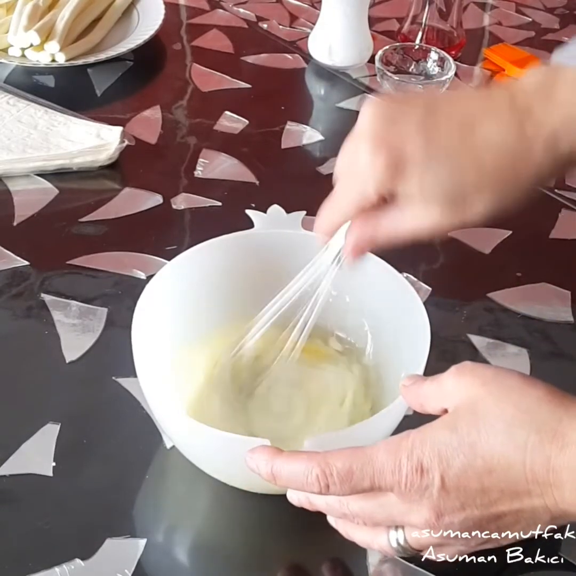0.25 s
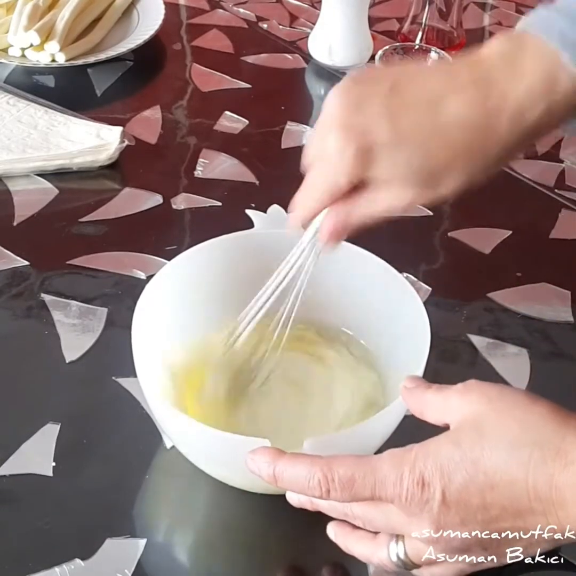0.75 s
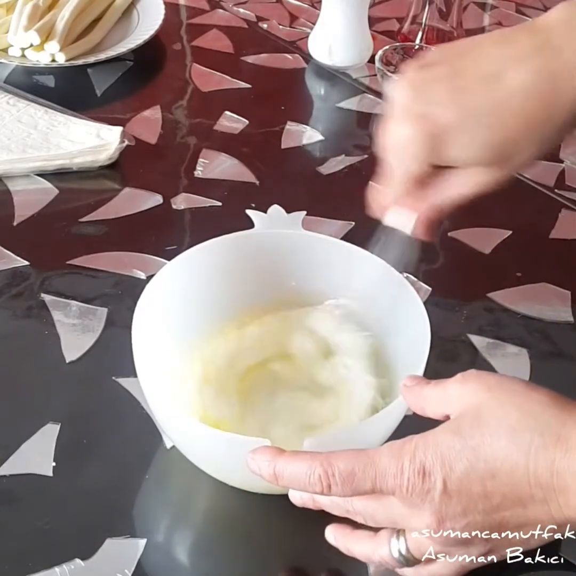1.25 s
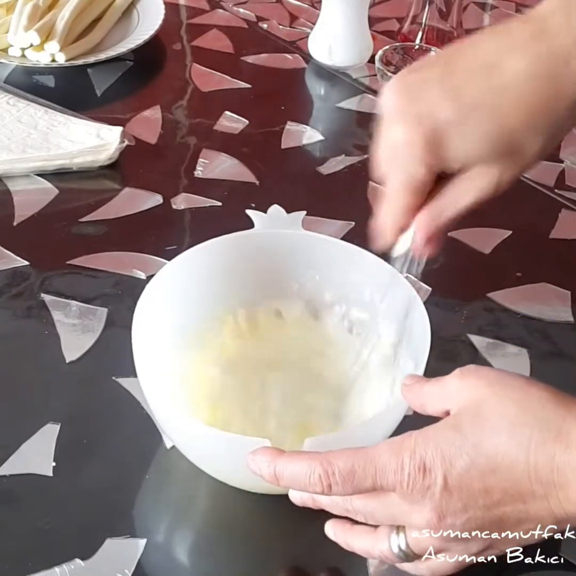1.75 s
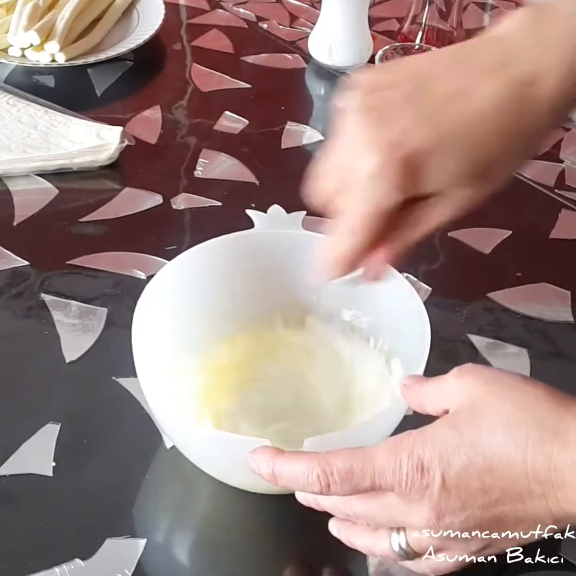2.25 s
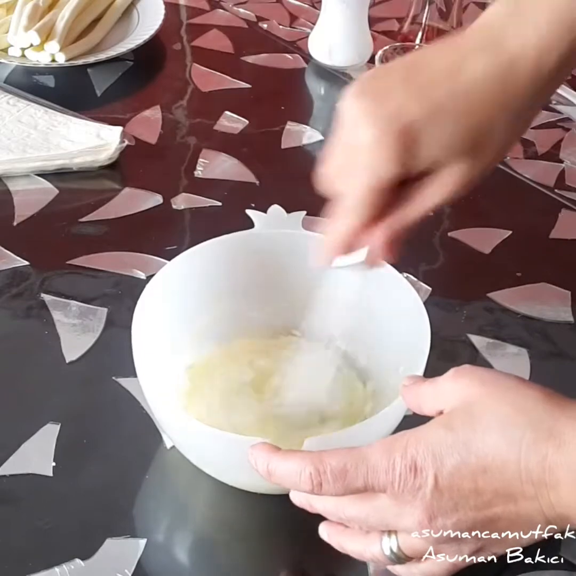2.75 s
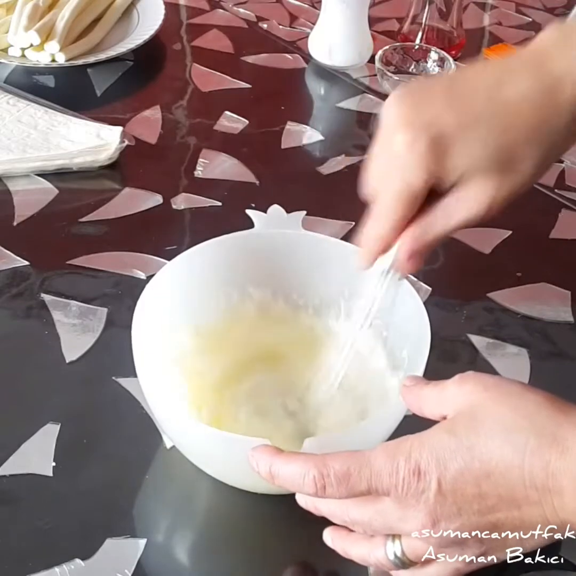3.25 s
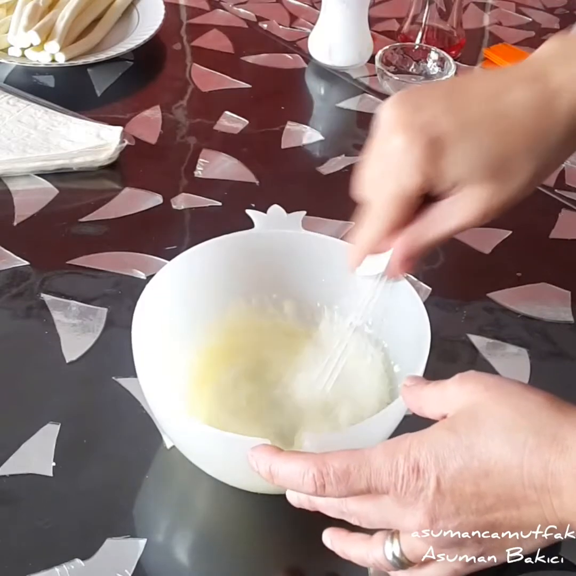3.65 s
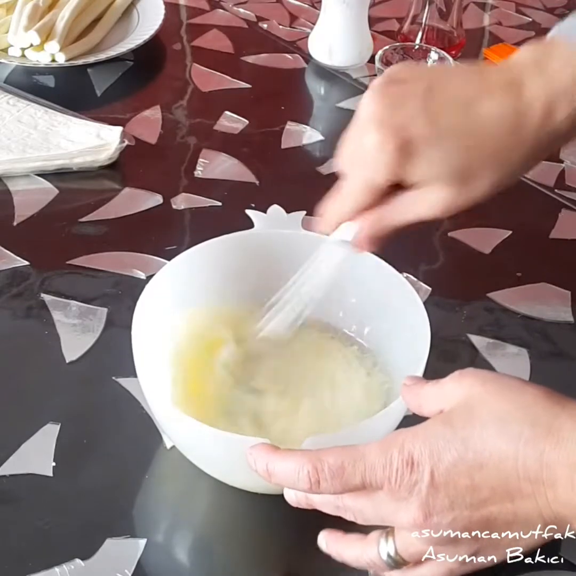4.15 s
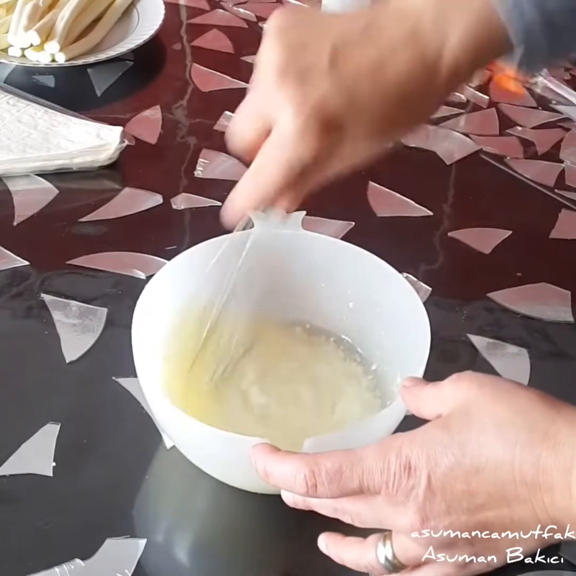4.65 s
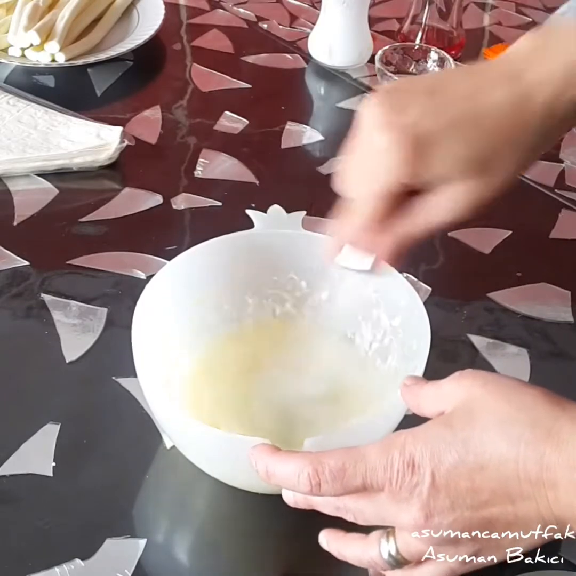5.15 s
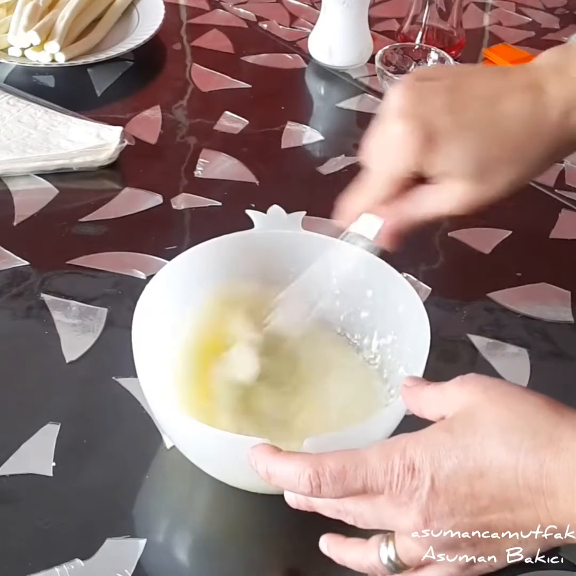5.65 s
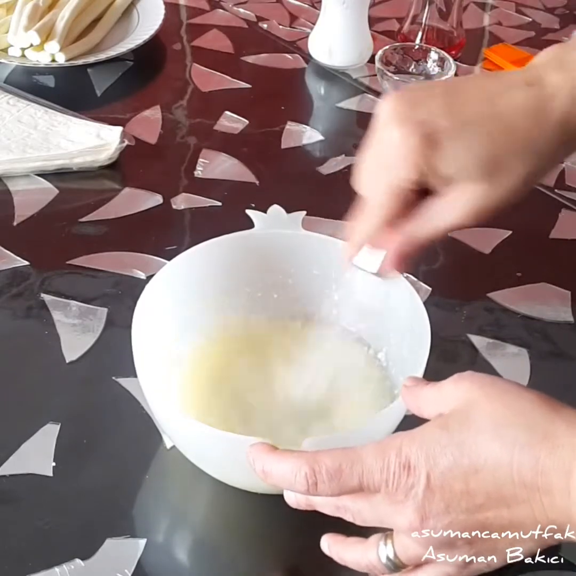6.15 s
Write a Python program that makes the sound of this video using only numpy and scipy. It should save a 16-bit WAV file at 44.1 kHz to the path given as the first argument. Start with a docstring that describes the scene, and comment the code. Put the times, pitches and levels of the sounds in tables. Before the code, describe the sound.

Close up, a wire whisk rapidly beats runny batter in a plastic bowl. Clusters of light hollow knocks and bright ticks mix with short wet scraping swishes and tiny bubbling blips. It starts busy, grows gentler around the middle, then turns loud and clattery with soft low bowl thumps. A hard kitchen adds a short, light echo over faint room hiss.

```python
"""On a kitchen table, close to a two-port microphone, a wire whisk beats thin batter in a plastic bowl.
The wires knock on the wall in small clusters and drag along it through the batter; both drive the modes
of body and wall, while noise cracks and clicks give the bright ticks of wire on plastic.
Bubbles burst as rising blips, the table booms as the bowl rocks, and sparse decaying echoes are the hard
kitchen; faint steady noise lies below."""
import sys
import numpy as np
from scipy import signal
from scipy.io import wavfile
from scipy.ndimage import uniform_filter1d

SR = 44100
rng = np.random.default_rng(int(sys.argv[2]) if len(sys.argv) > 2 else 0)


def inscribe(sig):
    """Save sig as 16-bit PCM at rate SR to the path in sys.argv[1].

    A 1-D sig is mono; a 2-D sig holds one channel per row.
    Samples are clipped to [-1, 1] before scaling.
    """
    pcm = np.round(np.clip(np.atleast_2d(sig).T, -1, 1) * 32767)
    wavfile.write(sys.argv[1], SR, pcm.astype(np.int16))


N = 281532  # length in samples

# All levels are relative: each layer is balanced again where it is made or mixed.
# Wires striking the wall:
# (time [s], knock level [dB], tick level over the knock [dB], pitch round which the struck spot rings best [Hz])
BLOWS = [(0.053, -18, -11, 2580), (0.103, -18.5, -1, 2720), (0.136, -15, 4, 1440), (0.26, -10.5, -9, 1490),
         (0.285, -12, -7, 1730), (0.312, -37, 17, 3540), (0.348, -17.5, 0, 2730), (0.448, -28, -12, 1900),
         (0.484, -23, -22, 2760), (0.501, -20.5, -24, 2560), (0.523, -14.5, -7, 1750),
         (0.568, -24.5, 11, 3580), (0.619, -14.5, -23, 3120), (0.709, -14.5, -25, 910),
         (0.762, -25, 6, 2740), (0.792, -18, 1, 970), (0.84, -24, 1, 3640), (0.928, -13.5, -10, 1710),
         (0.954, -16.5, -23, 1470), (1.018, -19, 3.5, 2930), (1.074, -30.5, 6.5, 4000),
         (1.091, -16.5, -4.5, 1770), (1.179, -27, -27, 1860), (1.195, -14.5, -13.5, 1630),
         (1.257, -23.5, 3, 3170), (1.326, -24, -13, 1000), (1.381, -43, 10, 3600), (1.387, -28, -18, 1000),
         (1.44, -30.5, 12, 4000), (1.445, -18.5, -27, 2430), (1.586, -21, -11, 1820),
         (1.668, -17.5, -23, 2580), (1.713, -31.5, 16, 3630), (1.805, -21, -4.5, 3050),
         (1.843, -16, -24, 2640), (1.91, -29, 0, 1800), (2.015, -18.5, -8, 955), (2.058, -12.5, -18, 2630),
         (2.103, -25.5, 2.5, 1710), (2.248, -11.5, -11, 1680), (2.266, -11, -7.5, 3200),
         (2.278, -11.5, -13, 2970), (2.476, -20.5, -4, 1500), (2.511, -21.5, -12, 2700),
         (2.549, -23.5, -23, 1700), (2.616, -27.5, -6, 1400), (2.703, -24, -15, 1980),
         (2.766, -33, 7, 2860), (2.781, -22.5, -22, 2620), (2.797, -24, -22, 2480),
         (2.865, -35.5, -3.5, 2680), (2.926, -26.5, -4, 1910), (2.993, -23.5, -23, 1620),
         (3.02, -25, -7, 2520), (3.176, -41, 3, 2750), (3.227, -38, -8, 2700), (3.278, -29.5, -3.5, 2920),
         (3.397, -30.5, -3, 1790), (3.432, -27, -6, 1910), (3.485, -24, -13, 2700), (3.592, -37, 2.5, 1850),
         (3.692, -27, -19, 1000), (3.714, -29.5, -8, 2750), (3.812, -37, 11.5, 3600),
         (3.87, -29.5, 9, 2800), (3.97, -23, -15, 2390), (4.049, -14.5, -13, 1160), (4.083, -29, 4, 2800),
         (4.096, -8, -11.5, 1740), (4.099, -8, -10, 1800), (4.202, -8, -7.5, 1520),
         (4.409, -19.5, -11, 1640), (4.46, -22.5, -7, 3360), (4.5, -16, -16.5, 961),
         (4.531, -14.5, -6, 1710), (4.563, -12.5, -3.5, 800), (4.631, -12.5, -5, 1020),
         (4.725, -17, -9, 1700), (4.739, -9.5, -5, 2600), (4.743, -7.5, -4.5, 1780), (4.845, -11, -4, 1050),
         (4.867, -14.5, -24, 1070), (4.907, -16.5, -19, 1800), (4.943, -10.5, -3, 3250),
         (4.955, -21.5, 1, 2700), (5.056, -17.5, -1.5, 3030), (5.141, -15, -15, 1000), (5.16, -23, -4, 960),
         (5.203, -18, 0, 2630), (5.246, -23.5, -1, 1830), (5.263, -18.5, -3, 1840), (5.3, -23, -4, 2580),
         (5.328, -13, -7.5, 2720), (5.614, -28, -4, 1780), (5.667, -19, -3, 2260), (5.752, -26.5, 6.5, 910),
         (5.89, -25.5, -15, 1010), (5.91, -25, -12, 2780), (5.98, -19, -11, 1720), (6.005, -13.5, -16, 940),
         (6.037, -30, 9, 2640), (6.136, -7.5, -1, 1110), (6.231, -11.5, -6.5, 1310), (6.251, -14, -3, 1790),
         (6.332, -26, 2, 1810)]
# Sweeps of the wires round the wall:
# (start [s], length [s], pressure [dB], thud over the pressure [dB], edge, the bright part [dB],
#  pitch round which the rubbed spot rings best [Hz])
SWEEPS = [(0.0, 0.0075, -48.5, -5, -40, 2150), (0.071, 0.076, -41.5, -7.5, -41, 2430),
          (0.11, 0.084, -46.5, -16, -38, 2540), (0.29, 0.065, -40, -8, -36.5, 1450),
          (0.394, 0.061, -46.5, -8, -42.5, 1730), (0.512, 0.14, -46.5, -6, -42, 1950),
          (0.702, 0.099, -42.5, -13, -39.5, 1880), (0.78, 0.079, -47.5, -8, -46.5, 1620),
          (0.887, 0.11, -46.5, -7.5, -42, 1650), (1.015, 0.14, -50.5, -26, -48, 2760),
          (1.182, 0.026, -46.5, -8, -47, 1330), (1.33, 0.093, -50.5, -12, -46.5, 2550),
          (1.489, 0.018, -48, -6.5, -39, 1980), (1.591, 0.03, -46.5, -19, -43.5, 2750),
          (1.666, 0.047, -44.5, -9.5, -42, 2840), (1.821, 0.049, -43, -7, -49.5, 1830),
          (1.909, 0.02, -54, -25, -39.5, 2220), (2.024, 0.079, -46, -8, -45.5, 1130),
          (2.274, 0.067, -44.5, -11, -46, 1250), (2.505, 0.022, -48.5, -2, -45, 2780),
          (2.568, 0.05, -50.5, -6, -46, 2460), (2.707, 0.068, -53, -8.5, -50, 2540),
          (2.943, 0.089, -58.5, -1.5, -53.5, 2080), (3.09, 0.13, -67, -24, -64, 2840),
          (3.292, 0.01, -63, -8, -52, 2540), (3.42, 0.084, -60.5, -0.5, -54, 2260),
          (3.564, 0.095, -62.5, -9, -58, 2540), (3.707, 0.074, -54.5, -5.5, -51, 2700),
          (3.821, 0.073, -48, -16, -44.5, 1850), (3.979, 0.041, -47.5, -12, -42.5, 2460),
          (4.076, 0.045, -37.5, -8, -37.5, 1610), (4.21, 0.023, -42, -21, -43, 930),
          (4.308, 0.023, -41, -8.5, -35.5, 2440), (4.41, 0.095, -46.5, -24, -42.5, 1730),
          (4.517, 0.074, -43.5, -6.5, -39.5, 1740), (4.66, 0.055, -47.5, -18, -49.5, 1370),
          (4.74, 0.011, -35.5, -32, -36.5, 1040), (4.85, 0.022, -42, -30, -41, 900),
          (4.949, 0.023, -34, -13.5, -31, 1760), (5.06, 0.061, -48, -5, -49, 1460),
          (5.147, 0.064, -44, -7.5, -38.5, 2090), (5.342, 0.032, -48, -15, -42.5, 1970),
          (5.419, 0.1, -59, -9, -49.5, 2670), (5.678, 0.057, -48, -7.5, -44.5, 1550),
          (5.804, 0.015, -47.5, -18, -42, 2100), (5.913, 0.071, -49, -26, -45.5, 3050),
          (6.011, 0.046, -42, -7, -35, 1520), (6.15, 0.05, -43.5, -11, -52, 1060),
          (6.248, 0.012, -36.5, -5, -34.5, 1480), (6.335, 0.036, -45, -3.5, -38.5, 2850)]
# Low thumps of the bowl body, some faint, some heavy, in time order: (time [s], level [dB], pitch round which
# the body rings best [Hz])
THUMPS = [(0.71, -37.5, 426), (1.197, -40, 446), (1.808, -40, 326), (2.271, -32, 348), (2.993, -48, 414),
          (4.106, -36, 330), (4.203, -43.5, 436), (4.478, -40, 395), (4.627, -42, 447), (4.741, -31, 412),
          (4.848, -36.5, 495), (4.945, -27.5, 320), (5.328, -37, 420), (6.138, -35, 500)]
# Modes of the bowl body, pushed by the weight of a blow: (middle pitch [Hz], level [dB], t60 [s])
BODY_MODES = [(255, -7, 0.07), (335, -4, 0.065), (425, -2, 0.04), (495, -3, 0.035)]
# Modes of the bowl wall: (middle pitch [Hz], level [dB], t60 [s])
WALL_MODES = [(705, -21, 0.05), (815, -11, 0.04), (960, -7, 0.035), (1081, -8, 0.03), (1340, -9, 0.02),
              (1690, -8, 0.018), (1810, -5.5, 0.02), (2330, -12, 0.025), (2600, -6, 0.018),
              (2760, -5, 0.02), (3050, -11, 0.02), (3238, -8.5, 0.03), (3600, -6, 0.022),
              (4420, -15, 0.035)]
# One wire loop that rings thinly: (pitch [Hz], level [dB], t60 [s])
WIRE_LOOP = (7375, -54, .2)
# Colour of wire on plastic: (pitch [Hz], spectrum level [dB])
TICK_COLOUR = [(500, -30.5), (2060, -12), (3500, -5.5), (4220, -3.5), (5180, -0.5), (6120, -3), (7200, 4),
               (7610, 5), (11500, -14), (14400, -17.5), (15200, -42)]
# Jolts of the table top as the bowl rocks on it: (time [s], level [dB])
ROCKING = [(0.599, -58), (1.099, -59.5), (2.272, -55), (4.206, -57.5), (4.474, -56.5), (4.637, -60),
           (4.755, -55), (4.949, -56), (5.327, -60)]
# Reverberation of the kitchen: (pitch [Hz], t60 [s])
KITCHEN_T60 = [(150, 0.53), (500, 0.44), (2000, 0.18), (6000, 0.3), (12000, 0.23)]
# Likeness of the two ports: (pitch [Hz], likeness from 0 to 1)
PORT_LIKENESS = [(60, 0.15), (150, 0.26), (400, 1), (650, 0.018), (2000, 0.056), (7000, 0.17), (15000, 1)]
# Colour of the quiet kitchen: (pitch [Hz], spectrum level [dB])
HUSH_COLOUR = [(12, -33), (20, 14), (59, 4), (415, -3.5), (613, -10), (1010, -10), (5520, -6), (7490, 0),
               (14400, -5.5), (15200, -38)]
# How fast a volley of wires thins out: (thud [dB/s], knock [dB/s], tick [dB/s])
THIN_DB_PER_S = (1800, 2600, 5000)

# Slopes of a sweep as (pressure, edge); a negative sag rises
BITE_DB_PER_S, SAG_DB_PER_S, LET_GO_DB_PER_S = (455, 420), (0.5, -2), (251, 274)
WEIGHT_DB = -20  # thud of a blow over its knock, before the mix
TABLE_HZ, TABLE_T60 = 119, 0.3  # middle pitch [Hz] and decay [s] of the table top
DIP_HZ, DIP_SHARE = 650, 0.61  # the bounce off the table cancels this share round this pitch
HUSH_DB = -61
EDGE_HZ = 15600  # upper band limit of the recorder


def blows(count=8):
    """Every blow is a volley of wires that thins out within a few ms, the ticks soonest."""
    s, db, edge_db, spot_hz = np.transpose(BLOWS)
    place, chance, sign = rng.random((len(s), 3, count)).transpose(1, 0, 2)
    wire = np.arange(count)
    late_s = 0.0008 * (wire + place * (wire > 0))  # the first wire lands on time
    at = np.minimum(((s[:, None] + late_s) * SR).astype(int), N - 1)
    signs = np.where(late_s > 0, np.sign(sign - 0.5), 1)
    share = gain_of(-5 * chance) * signs
    swell = 1 - np.exp(-(late_s + 0.0004) / 0.0006)  # the wall yields before it rings
    sizes = []
    # thud, knock and tick; ticks start at once
    for extra_db, thin, rise in zip((WEIGHT_DB, 0, edge_db), THIN_DB_PER_S, (swell, swell, 1)):
        fading = gain_of((db + extra_db)[:, None] - thin * late_s)
        sizes.append(fading * share * rise)
    return at, spot_hz, sizes


def sweeps(t):
    """Each sweep bites, holds and lets go: summed thud, pressure and edge [dB], and the strongest one's spot."""
    start, length, db, weight_db, edge_db, spot_hz = np.transpose(SWEEPS)[:, :, None]
    since = t - start
    early = np.maximum(-since, 0)
    held = np.clip(since, 0, length)
    late = np.maximum(since - length, 0)
    press, edge = (-bite * early - sag * held - go * late
                   for bite, sag, go in zip(BITE_DB_PER_S, SAG_DB_PER_S, LET_GO_DB_PER_S))
    levels = []
    for each in (db + weight_db + press, db + press, edge_db + edge):
        power = np.sum(gain_of(2 * each), axis=0)
        levels.append(10 * np.log10(power + 1e-12))
    strongest = np.argmax(db + press, axis=0)
    return levels, spot_hz[strongest, 0]


def drag(per_s=1800):
    """Tiny slips of wire on the wet wall, some larger than the rest, coming in small clumps."""
    at = np.flatnonzero(rng.random(N) < per_s / SR)
    levels, spot_hz = sweeps(at / SR)
    uneven_db = 2.4 * np.minimum(rng.exponential(1, N), 4)
    clumps_db = 3 * drift(0.006)
    uneven = evened(gain_of(uneven_db + clumps_db)[at])
    size = gain_of(-3.5) * uneven * np.sqrt(SR / per_s)
    return at, spot_hz, [size * gain_of(level) for level in levels]


def thumps(hit_at, thud, level_db=4.0, middle_hz=400):
    """The thuds of all blows and the low thumps, each thump a single push on the body, as one list."""
    s, db, spot_hz = np.transpose(THUMPS)
    push = np.zeros((len(s), hit_at.shape[1]))
    push[:, 0] = gain_of(db + level_db)
    at = np.repeat((s[:, None] * SR).astype(int), hit_at.shape[1], axis=1)
    all_hz = np.r_[np.full(len(hit_at), middle_hz), spot_hz]
    return np.r_[hit_at, at], np.r_[thud, push], all_hz


def bowl(hit_at, hit_size, slip_at, slip_size, modes, spot_hz, rub_hz, place_db=2.0, wander_db=4.5,
         focus_db=7.0, rub_focus_db=3.5, ping_db=3.0):
    """Each blow rings another mix of modes; the drag wanders over the wall, now and then pinging one mode."""
    out = np.zeros((2, N))
    energy = sum(gain_of(2 * db) * t60 * SR / (4 * np.log(1000)) for hz, db, t60 in modes)
    for hz, db, t60 in modes:
        # both focuses fall off per octave from the spot's own pitch
        spot_db = place_db * rng.standard_normal(len(hit_at))
        spot_db -= focus_db * abs(np.log2(hz / spot_hz))
        rub_db = wander_db * drift(0.033)[slip_at]
        rub_db -= rub_focus_db * abs(np.log2(hz / rub_hz))
        pings = evened(gain_of(ping_db * np.minimum(rng.exponential(1, len(slip_at)), 5)))
        hits = hit_size * gain_of(spot_db)[:, None] / np.sqrt(len(modes))
        slips = slip_size * pings * gain_of(rub_db) * rng.choice([-1, 1], len(slip_at))
        drive = two_ports(hit_at.ravel(), hits.ravel(), hz)
        drive += two_ports(slip_at, slips / np.sqrt(energy), hz)
        loaded_hz = hz * (1 + 0.035 * drift(0.08))  # batter sloshing up the wall loads it
        out += gain_of(db) * ring(drive, loaded_hz, t60)
    return out


def wires(hit_at, hit_size, slip_at, slip_size, crack_s=0.00051, crack_db=-4):
    """Bright ticks: each wire a short crack of noise, each slip a click; one loop rings on."""
    hz, db, t60 = WIRE_LOOP
    hits = np.zeros(N)
    np.add.at(hits, hit_at.ravel(), abs(hit_size.ravel()))
    crack = signal.lfilter([1], [1, -np.exp(-1 / (crack_s * SR))], hits)
    shared, *own = rng.uniform(-1.5, 1.5, (3, N))
    noise = 0.043 * shared + 1.59 * np.array(own)  # almost wholly different in the two ports
    cracks = gain_of(crack_db) * patchy(crack * noise, 2.07)
    slips = two_ports(slip_at, slip_size * rng.choice([-1, 1], len(slip_at)), hz).real
    clicks = gain_of(-0.5) * patchy(slips)
    ticks = colour(cracks + clicks, TICK_COLOUR)
    return ticks + gain_of(db) * ring(ticks, hz, t60)


def patchy(x, depth_db=4.5):
    """The colour shifts from moment to moment as other wires touch other spots."""
    z = signal.stft(x, nperseg=256)[2]
    patches = rng.standard_normal(z.shape[:0:-1]).T  # one pattern for both ports
    patches = uniform_filter1d(patches, size=5, axis=0)
    patches = evened(uniform_filter1d(patches, size=12, axis=1))
    return signal.istft(z * gain_of(depth_db * patches), nperseg=256)[1][:, :N]


def batter(slip_at, slip_size, level_db=-4.5, share=0.055, cycles=4.85, glide=0.31, count=14):
    """Small bubbles burst behind the wires: short blips of rising pitch, on a random share of the slips."""
    kind = rng.integers(0, count, len(slip_at))
    burst = rng.random(len(slip_at)) < share
    out = np.zeros((2, N))
    for k, hz in enumerate(np.geomspace(900, 9000, count)):
        turns = np.arange(int(3 * cycles * SR / hz)) * hz / SR
        swell = turns * np.exp(-2 * turns / cycles)
        blip = swell * np.sin(2 * np.pi * turns * (1 + glide * turns / (6 * cycles)))
        pick = burst & (kind == k)
        train = two_ports(slip_at[pick], slip_size[pick], hz).real
        out += signal.oaconvolve(train, blip[None] / np.linalg.norm(blip), axes=1)[:, :N]
    return gain_of(level_db) * out / np.sqrt(share)


def table(slip_at, slip_size, jolt_db=7.0, rumble_db=-39.5):
    """Jolts of the bowl, and the weight of the drag, ring the lowest mode of the table top."""
    s, db = np.transpose(ROCKING)
    drive = np.zeros(N)
    drive[slip_at] = gain_of(rumble_db) * slip_size * rng.choice([-1, 1], len(slip_at))
    drive[(s * SR).astype(int)] += gain_of(db + jolt_db)
    soft_drive = uniform_filter1d(drive, size=150)  # samples
    return ring(soft_drive, TABLE_HZ * (1 + 0.021 * drift(0.15)), TABLE_T60)


def kitchen(x, first_s=0.004):
    """Sparse random taps, each band dying at its own speed; ports most alike near 400 Hz and at the very top."""
    out = np.zeros((2, N))
    turns = np.arange(N) / SR * 2.3
    starts = np.arange(int(first_s * SR), SR // 2 - 20, 20)
    for k in range(3):  # the whisk moves, so the sound is handed round three tails
        taps = np.zeros((2, SR // 2))
        at = starts + rng.integers(0, 20, (2, len(starts)))
        np.put_along_axis(taps, at, rng.choice([-1., 1.], at.shape), 1)
        hz, t, z = signal.stft(taps, SR, nperseg=256)
        alike = np.clip(read(PORT_LIKENESS, hz), 0, 1)[:, None]
        z[1] = alike * z[0] + np.sqrt(1 - alike ** 2) * z[1]
        decay = gain_of(-60 * t / read(KITCHEN_T60, hz)[:, None])
        tail = signal.istft(z * decay, SR, nperseg=256)[1]
        share = np.sqrt(2 / 3) * np.cos(np.pi * (turns + k / 3))
        out += signal.fftconvolve(x * share, tail / np.linalg.norm(tail[0]), axes=1)[:, :N]
    return out


def hush():
    """Steady faint noise of the room and the microphone."""
    return gain_of(HUSH_DB) * colour(rng.standard_normal((2, N)), HUSH_COLOUR)


def two_ports(at, size, hz):
    """A click train as two ports hear it: the less alike at this pitch, the more the phase scatters."""
    scatter = np.sqrt(-2 * np.log(np.clip(read(PORT_LIKENESS, hz), 0.05, 0.99)))
    turn = scatter / 2 * rng.standard_normal(len(at))
    out = np.zeros((2, N), complex)
    np.add.at(out[0], at, size * np.exp(1j * turn))
    np.add.at(out[1], at, size * np.exp(-1j * turn))
    return out


def ring(drive, hz, t60):
    """One mode, whose pitch may move: shift it to zero, let it die away, shift back."""
    turn = np.exp(2j * np.pi * np.cumsum(hz * np.ones(N)) / SR)
    pole = np.exp(-np.log(1000) / (max(t60, 0.004) * SR))
    return (turn * signal.lfilter([1], [1, -pole], drive * turn.conj())).imag


def colour(x, points):
    """Causal minimum-phase filter of unit energy with the given spectrum."""
    hz = abs(np.fft.fftfreq(4096, 1 / SR))
    log_gain = np.log(gain_of(np.maximum(read(points, hz), -80)))
    taps = np.fft.ifft(np.exp(np.conj(signal.hilbert(log_gain)))).real[:2048]
    return signal.oaconvolve(x, taps[None] / np.linalg.norm(taps), axes=1)[:, :N]


def drift(seconds):
    """Slow random line through normal points of unit spread, one every so many seconds."""
    steps = int(N / SR / seconds) + 2
    return np.interp(np.arange(N) / SR / seconds, np.arange(steps), rng.standard_normal(steps))


def read(points, hz):
    """Reads a table over log frequency."""
    f, value = np.transpose(points)
    return np.interp(np.log(hz + 1), np.log(f + 1), value)


def evened(x):
    """Scales to rms 1."""
    return x / np.sqrt(np.mean(abs(x) ** 2) + 1e-20)


def gain_of(db):
    """dB to amplitude."""
    return 10 ** (np.asarray(db) / 20)


def scene():
    """Blows and drag ring body, wall and wires; the table and the kitchen answer."""
    hit_at, spot_hz, (thud, knock, tick) = blows()
    slip_at, rub_hz, (weight, pressure, edge) = drag()
    push_at, push, push_hz = thumps(hit_at, gain_of(-11.5) * thud)
    body = bowl(push_at, push, slip_at, weight, BODY_MODES, push_hz, 610, place_db=4.5, focus_db=18.0)
    wall = bowl(hit_at, gain_of(2.0) * knock, slip_at, gain_of(3.5) * pressure, WALL_MODES, spot_hz, rub_hz)
    thin_bass = signal.butter(4, 220, "high", fs=SR, output="sos")  # bowl and wall sound thin below about 220 Hz
    near = signal.sosfilt(thin_bass, body + wall)
    near += wires(hit_at, tick, slip_at, edge)
    bounce = signal.lfilter(*signal.iirpeak(DIP_HZ, 2.5, SR), near)
    near -= DIP_SHARE * bounce
    near += batter(slip_at, np.sqrt(pressure * edge))
    return near + gain_of(-4) * kitchen(near) + table(slip_at, weight) + hush()


def record(dry):
    """The band limit of the recorder."""
    low_pass = signal.firwin(511, EDGE_HZ, window=("kaiser", 9), fs=SR)
    return signal.oaconvolve(dry, low_pass[None], "same")


dry = scene()
out = record(dry)
inscribe(out)
```